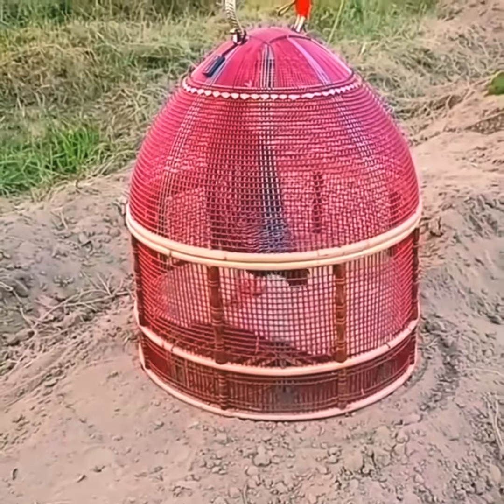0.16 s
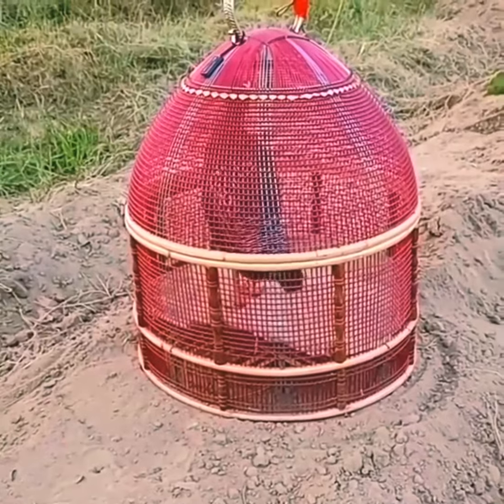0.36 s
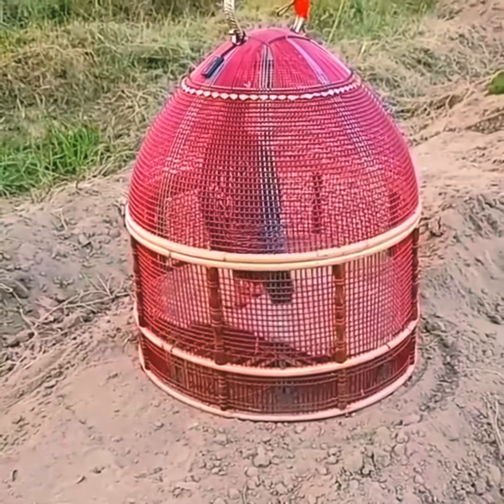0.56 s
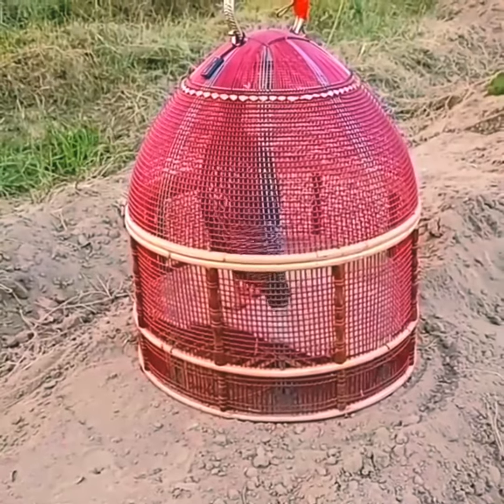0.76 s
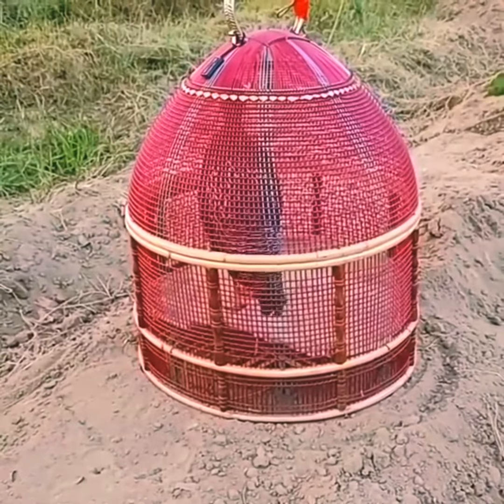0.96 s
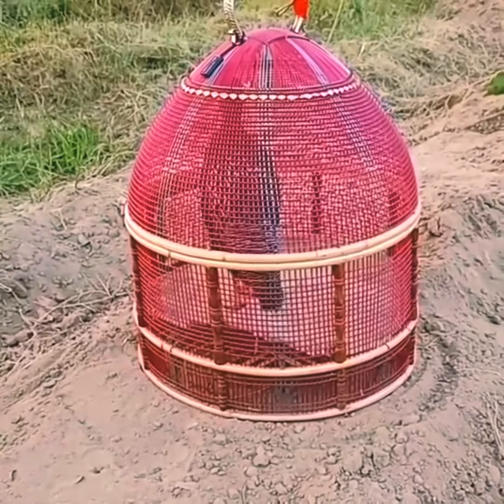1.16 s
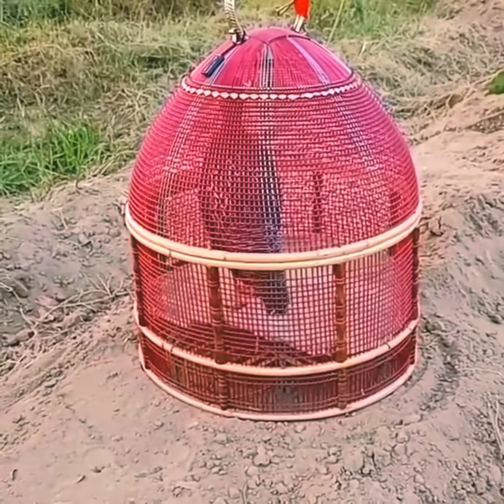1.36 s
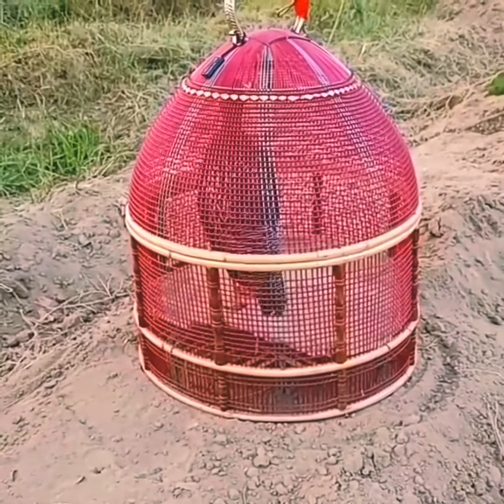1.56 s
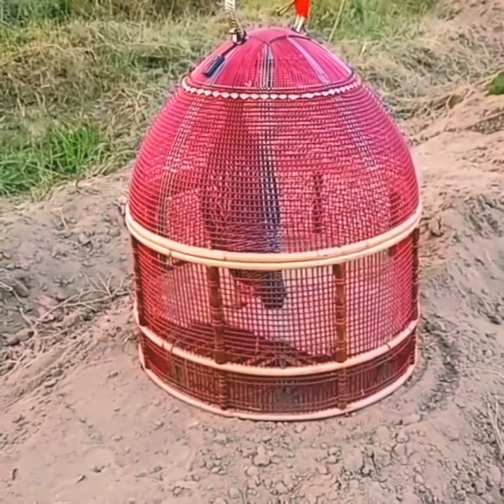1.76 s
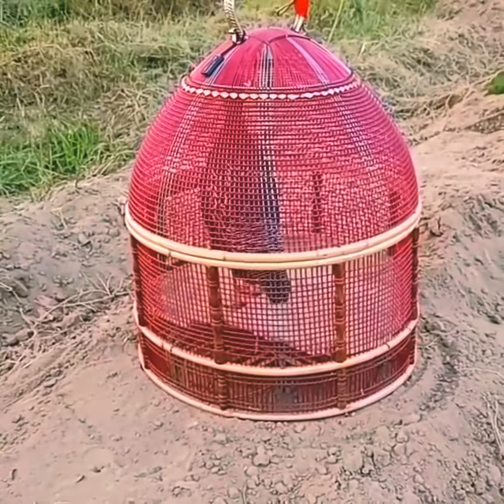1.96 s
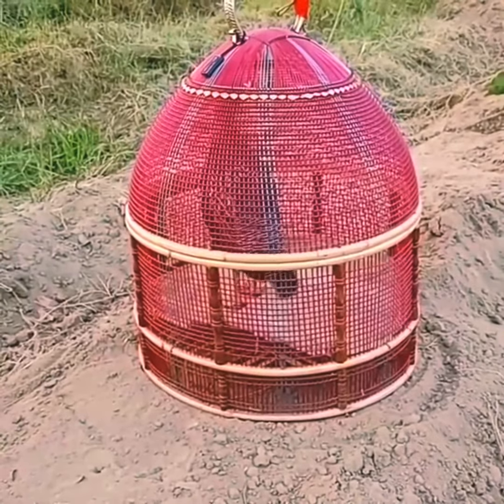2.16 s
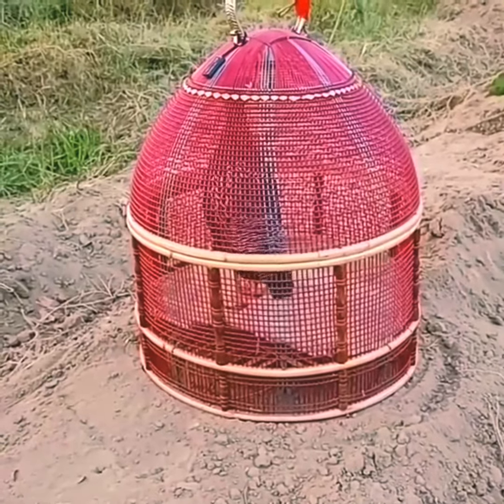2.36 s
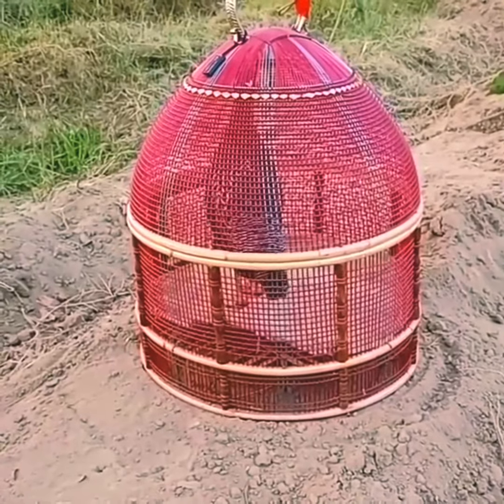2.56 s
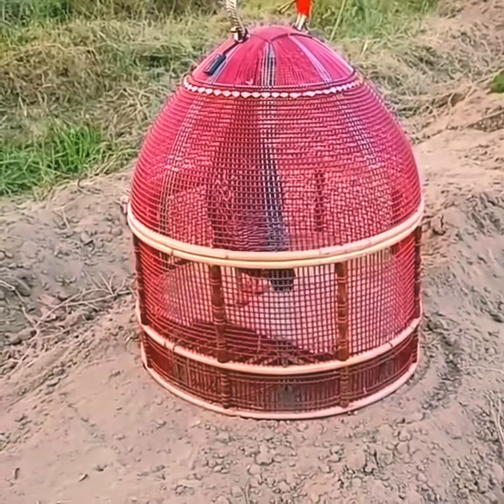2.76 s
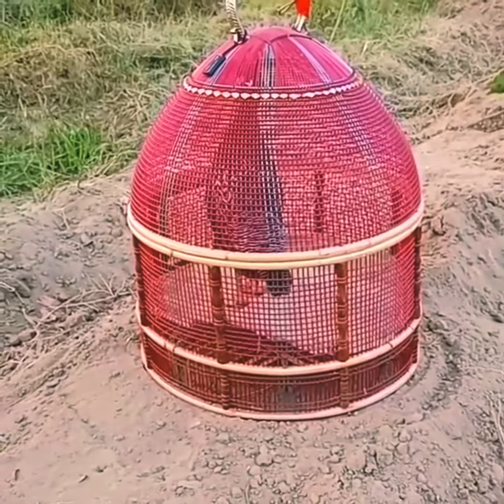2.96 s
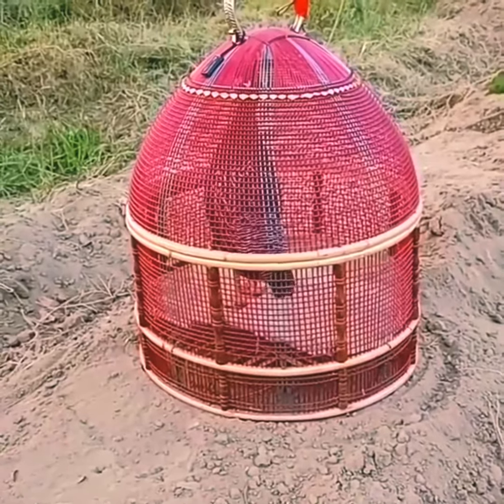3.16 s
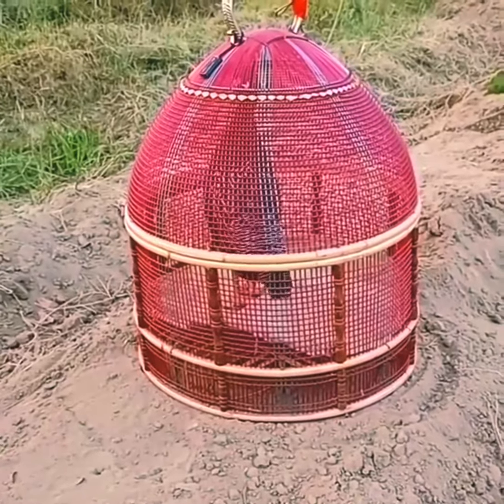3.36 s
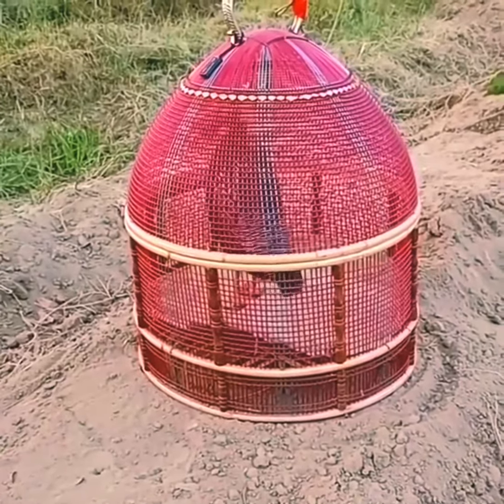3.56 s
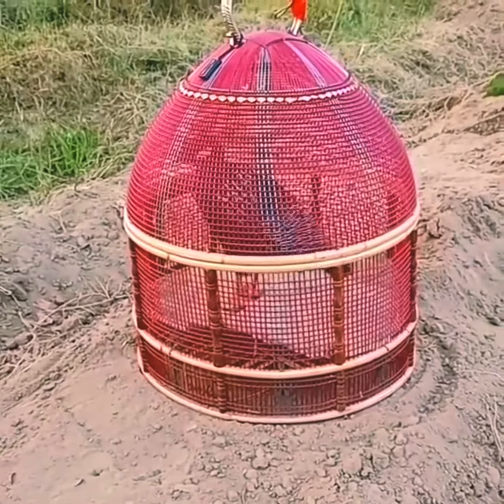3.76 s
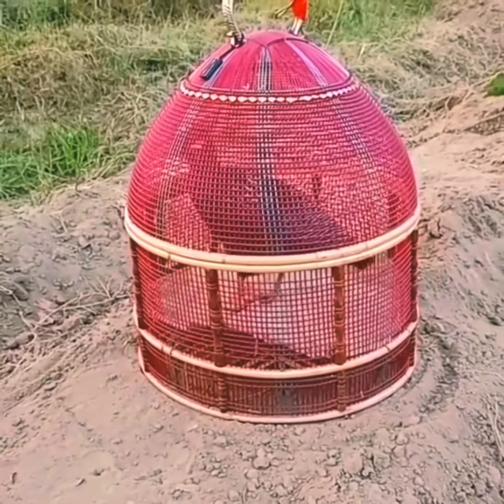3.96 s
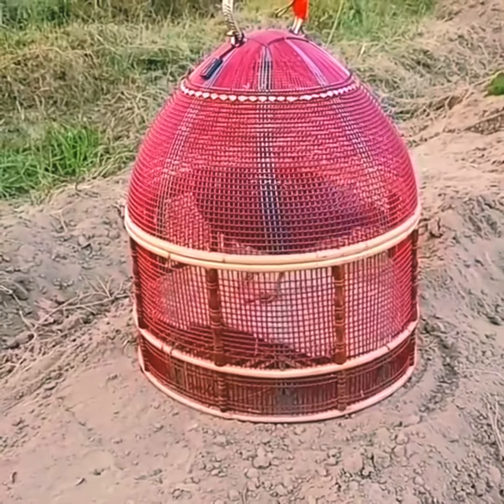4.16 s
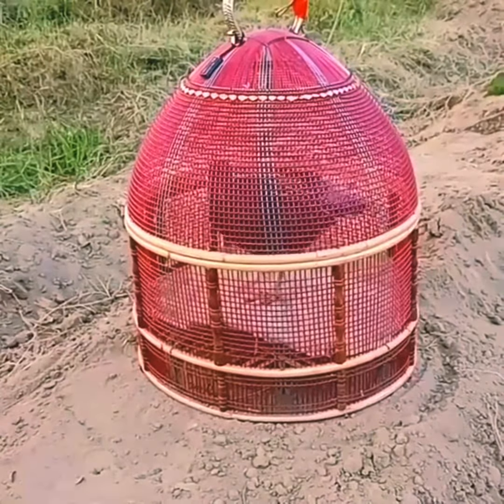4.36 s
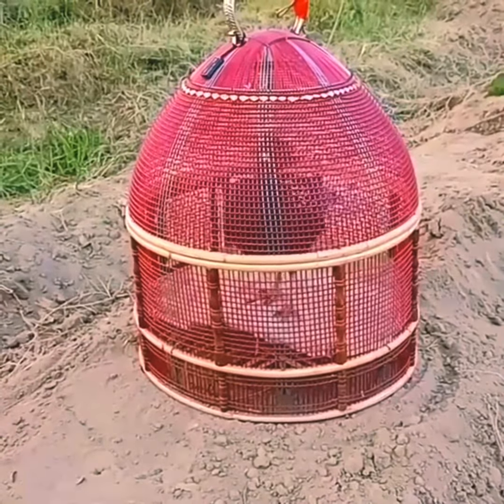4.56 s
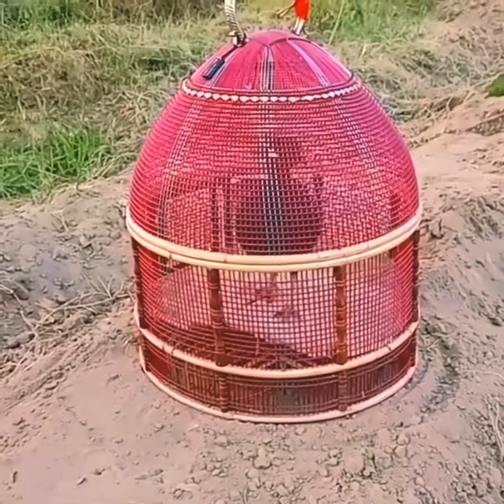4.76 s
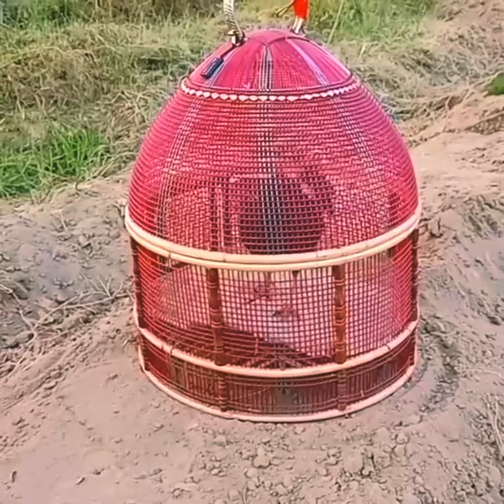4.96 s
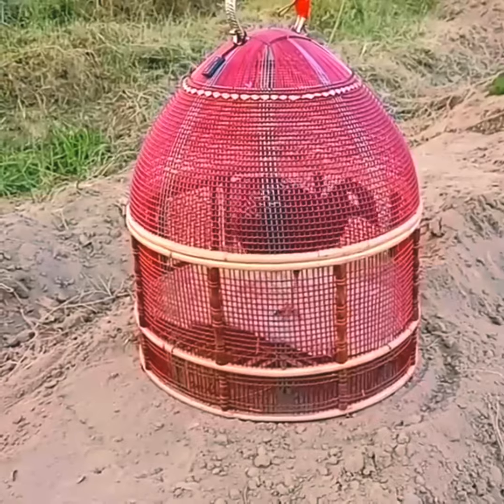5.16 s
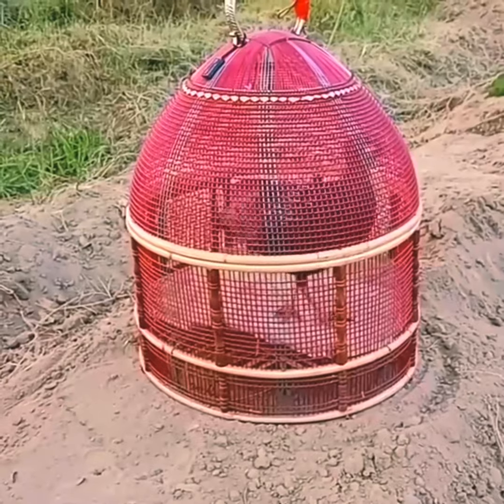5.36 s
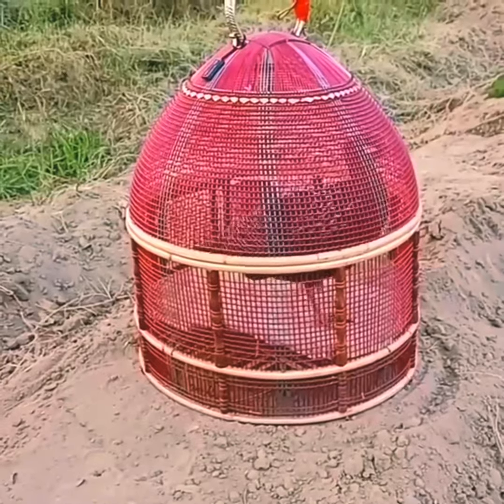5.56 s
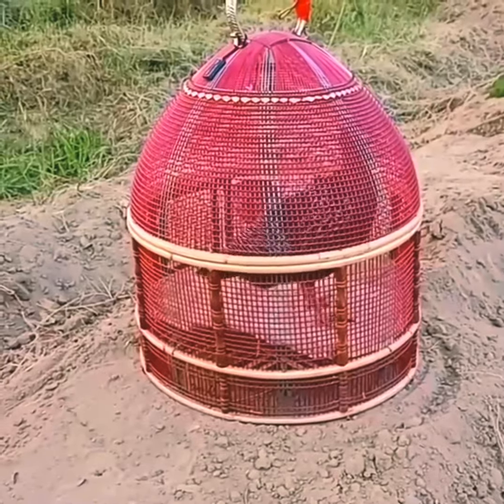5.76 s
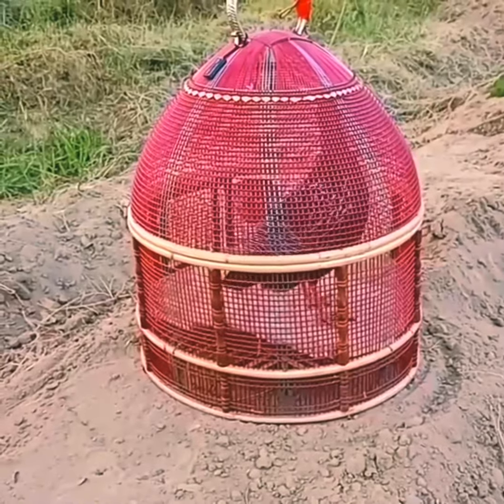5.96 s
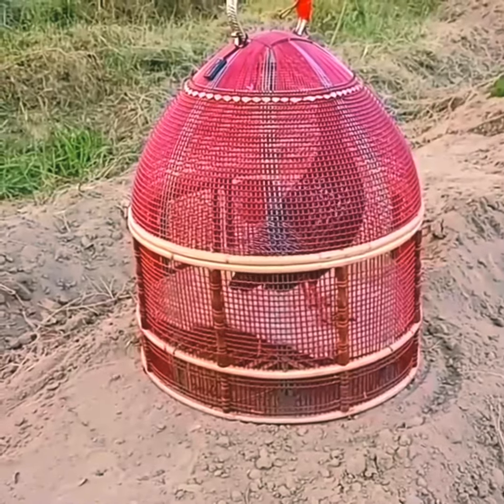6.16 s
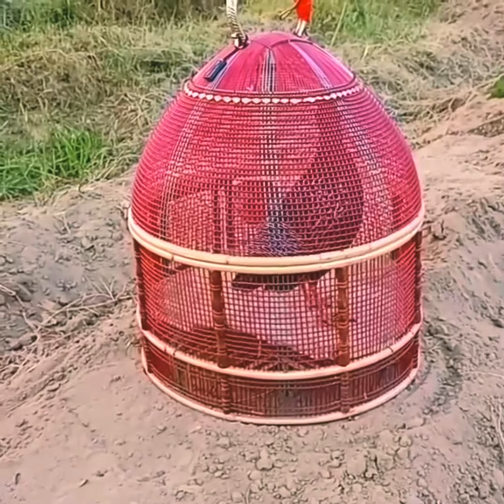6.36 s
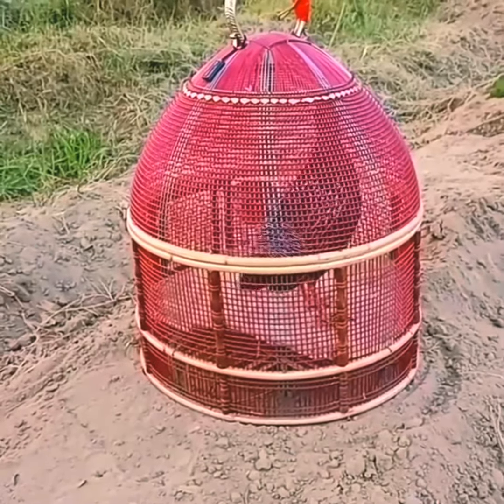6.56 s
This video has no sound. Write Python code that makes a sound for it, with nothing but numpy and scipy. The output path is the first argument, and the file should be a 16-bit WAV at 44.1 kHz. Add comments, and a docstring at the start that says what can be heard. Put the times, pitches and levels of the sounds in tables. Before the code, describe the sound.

Four loud, rasping partridge calls follow a sharp squeak, leaving soft whistles, a distant dove and a brief scratch on wicker.

```python
"""Caged partridge on farmland

A partridge in a wicker cage gives a few clucks, a squeak and four loud, harsh notes. Each harsh note is
a whistle swept over an octave some 250 times a second, now and then catching on its top pitch.
Soft whistles and chirps, a far dove, insects and a low rumble lie around it; later the bird steps about."""
import sys
import numpy as np
from scipy import signal
from scipy.fft import rfft, irfft, next_fast_len
from scipy.io import wavfile
from scipy.ndimage import uniform_filter1d, minimum_filter1d

SR = 44100
rng = np.random.default_rng(int(sys.argv[2]) if len(sys.argv) > 2 else 0)


def transcribe(u):
    """Save the signal u as a 16-bit wav file named by the first command-line argument.

    u: samples, shape (n,) or (channels, n), limited to [-1, 1]; the rate is SR.
    q: integer samples, one column per channel.
    """
    v = np.clip(np.atleast_2d(u).T, -1, 1)
    q = np.round(v * 32767).astype(np.int16)
    wavfile.write(sys.argv[1], SR, q)


N = 291060
T = np.arange(N) / SR

# squeak and harsh notes: start_s, end_s, level_db, attack_s, sweep_hz, low_turn_hz, low_dwell (1 = even)
HARSH_NOTES = [(0.3098, 0.337, -5, .004, 235, 2850, 1.6), (.686, .821, -7.5, .0016, 288, 3011, 2.2),
               (.988, 1.169, -9, 0.0059, 256, 2904, 1.49), (1.381, 1.468, -6.5, 0.011, 250, 2930, 1.25),
               (1.527, 1.703, -9, 0.0071, 250, 2893, 1.22)]
# throat and beak response: freq_hz, gain_db
THROAT_RESPONSE = [(600, -27), (1150, -26), (1450, -11), (1850, -7.5), (2300, -9), (2650, -6), (3100, 4.5),
                   (3700, -3), (4350, 2), (5150, -4), (5800, 2.5), (6900, 2), (8200, -9.5), (10000, -14),
                   (13600, -28), (15100, -4), (16000, -16)]


def from_db(db):
    """Decibels to gain."""
    return 10 ** (np.asarray(db) / 20)


def unit_rms(x):
    """Scale to unit power."""
    return x / np.sqrt(np.mean(x ** 2) + 1e-20)


def colour(x, points):
    """Filter by a curve of (freq_hz, gain_db) points."""
    hz, db = np.transpose(points)
    size = next_fast_len(len(x) + SR // 10)
    bins_hz = np.maximum(np.arange(size // 2 + 1) * SR / size, 1)
    gain = from_db(np.interp(np.log(bins_hz), np.log(hz), db))
    return irfft(rfft(x, size) * gain, size)[:len(x)]


def wander(rate_hz):
    """Smooth random drift, unit RMS."""
    lowpass = signal.butter(2, rate_hz, fs=SR, output="sos")
    return unit_rms(signal.sosfilt(lowpass, rng.standard_normal(N)))


def phase_of(hz):
    """Running oscillator phase in radians."""
    return 2 * np.pi * np.cumsum(hz) / SR


def note(start_s, length_s):
    """Sample indices, progress u (0-1) and half-sine swell of a note."""
    at = np.flatnonzero((T >= start_s) & (T < start_s + length_s))
    u = (T[at] - start_s) / length_s
    return at, u, np.sqrt(2) * np.sin(np.pi * u)


def field(rumble_swell_db=4.0, hiss_swell_db=1.46, lull_at_s=3.68, lull_length_s=.062):
    """Rumble and faint hiss of open land swell together; the rumble dips once, briefly."""
    # freq_hz, density_db
    spectrum = [(25, -21.5), (45, -9), (78, -0.5), (125, -9), (200, -17), (350, -25), (700, -29),
                (1500, -33), (3000, -32.5), (6000, -35), (8000, -36.5), (9000, -47.5), (13000, -46.5),
                (15500, -42.5)]
    air = from_db(-68) * unit_rms(colour(rng.standard_normal(N), spectrum))
    rumble = signal.sosfiltfilt(signal.butter(2, 250, fs=SR, output="sos"), air)
    hiss = air - rumble
    swell = wander(6)
    lull_db = -9 * np.exp(-(2 * (T - lull_at_s) / lull_length_s) ** 2)
    return rumble * from_db(rumble_swell_db * swell + lull_db - 3) + hiss * from_db(hiss_swell_db * swell)


def insects(fade_s=.12):
    """A thin, high band of noise, sung in bouts."""
    # start_s, end_s, level_db
    bouts = [(-.1, 0.403, -81), (1.75, 2.602, -78), (2.739, 3.521, -78), (3.718, 4.38, -82),
             (4.401, 5.17, -78.5), (5.48, 6.08, -76), (6.25, 6.8, -82)]
    # freq_hz, density_db
    band = [(5500, -39), (7000, -14.5), (7600, 0.5), (7950, -2), (8300, -32), (9000, -62)]
    level = sum(from_db(db) * np.clip(np.minimum(T - start_s, end_s - T) / fade_s, 0, 1)
                for start_s, end_s, db in bouts)
    return level * unit_rms(colour(rng.standard_normal(N), band))


def chatter(count=1100, length_s=.025, low_hz=2900, high_hz=5400, spread_db=6.5):
    """Far small birds: tiny, scratchy glides at random times, in two registers."""
    # time_s, level_db
    loudness = [(0, -86), (2.2, -72), (3.0, -84), (4.9, -96), (5.2, -69.5), (5.9, -77.5), (6.6, -79.5)]
    out, shake = np.zeros(N), 1 + .03 * wander(600)
    for k, start_s in enumerate(rng.uniform(0, N / SR, count)):
        pitch, slope, size = rng.standard_normal(3)
        at, u, swell = note(start_s, length_s)
        hz = (low_hz if k % 2 else high_hz) * 2 ** (.2 * pitch + .1 * slope * (u - .5))
        out[at] += from_db(spread_db * size) * swell * np.sin(phase_of(hz * shake[at]))
    return from_db(np.interp(T, *np.transpose(loudness))) * unit_rms(out)


def dove(pitch_hz=547.3, sag=.072):
    """Pure coos that sag in pitch at the end."""
    # start_s, length_s, level_db
    coos = [(1.25, .15, -72.5), (1.731, 0.1, -69.5), (2.168, .15, -70.5), (2.847, .13, -67),
            (3.23, 0.37, -75.5), (3.878, 0.083, -70), (4.431, 0.18, -67.5), (4.821, 0.25, -78),
            (5.46, .13, -71), (6.32, 0.12, -71)]
    out, shake = np.zeros(N), 1 + .025 * wander(39.65)
    for start_s, length_s, db in coos:
        at, u, swell = note(start_s, length_s)
        out[at] += from_db(db) * swell * np.sin(phase_of(pitch_hz * (1 - sag * u ** 3) * shake[at]))
    return out


def whistles(warble_hz=255, rise_oct=.34, fall_oct_per_s=12.5, chip_hz=2900, chip_every_s=.143):
    """Small birds, near sines: bent rises, steady falls, twitters and a run of buzzy falling chips."""
    # start_s, length_s, mid_pitch_hz, level_db, bend_oct (negative levels off), warble_oct
    rises = [(0.076, 0.1, 4886, -50.5, -0.79, 0.014), (0.178, 0.042, 6930, -61, -0.82, 0.012),
             (0.516, 0.095, 4770, -53.5, -0.5, 0), (0.537, 0.081, 4160, -58, -1, .02),
             (2.613, 0.093, 5010, -70.5, -.6, .03), (2.835, 0.078, 4700, -69.5, -.5, .05),
             (3.478, 0.049, 4700, -76, 0, .03), (3.69, .058, 4544, -79, -.2, .03),
             (6.03, .065, 6300, -76, -.4, .11), (6.091, .12, 5650, -69, -.2, .02),
             (6.216, 0.051, 6200, -74, 0.0051, .05), (6.291, .08, 5520, -69.5, .4, 0.044),
             (6.414, 0.052, 5680, -58, -0.017, .09), (6.453, 0.046, 5400, -69, 0.42, 0.013),
             (6.544, 0.094, 5740, -54, .2, .04)]
    # start_s, length_s, mid_pitch_hz, level_db
    falls = [(0.597, 0.082, 3100, -48), (1.886, 0.1, 3200, -64.5), (2.321, 0.085, 3634, -60),
             (3.345, .05, 4710, -74.5), (3.545, 0.034, 4950, -81), (4.448, 0.068, 2954, -77),
             (5.07, 0.025, 3386, -66), (5.3, 0.032, 3460, -66)]
    # start_s, length_s, pitch_hz, level_db, syllables_per_s, syllable_drop_oct
    twitters = [(0.045, .13, 2515, -61.5, 23, -0.21), (.163, .055, 2250, -61.5, 36, 0.14),
                (0.401, .11, 2235, -61.5, 9, .08), (1.854, 0.085, 2548, -58.5, 13, 0.24),
                (2.038, 0.097, 2220, -56, 12, 0.38), (2.124, 0.084, 2153, -67, 14, 0.23),
                (2.2, 0.074, 2377, -60.5, 40, 0.11), (2.405, 0.065, 2360, -64, 62, .28),
                (2.73, 0.27, 2550, -75, 4, .12), (3.079, .1, 2300, -77.5, 10, 0.26),
                (3.501, 0.065, 2910, -77.5, 16, 0), (4.757, 0.2, 2680, -72.5, 110, 0.012),
                (5.34, 0.21, 2520, -79, 5, .45)]
    out, shake = np.zeros(N), 1 + .008 * wander(360)
    warble = np.sin(phase_of(warble_hz * (1 + wander(45) / 4)))
    flutter = from_db(3 * wander(75.9))

    def sing(at, swell, hz, db, overtone_db=-40):
        """Add one note along a pitch path."""
        phase = phase_of(hz * shake[at])
        tone = np.sqrt(2) * (np.sin(phase) + from_db(overtone_db) * np.sin(2 * phase))
        out[at] += from_db(db) * swell ** 1.379 * flutter[at] * tone

    for start_s, length_s, hz, db, bend_oct, warble_oct in rises:
        at, u, swell = note(start_s, length_s)
        octaves = rise_oct * (u - .5) + bend_oct * (u - .5) ** 2 + warble_oct * warble[at]
        sing(at, swell, hz * 2 ** octaves, db)
    for start_s, length_s, hz, db in falls:
        at, u, swell = note(start_s, length_s)
        sing(at, swell, hz * 2 ** (-fall_oct_per_s * length_s * (u - .5)), db)
    for start_s, length_s, hz, db, syllables_per_s, drop_oct in twitters:
        at, u, _ = note(start_s, length_s)
        syllable, part = np.divmod(u * max(round(length_s * syllables_per_s), 1), 1)
        step_oct = .0914 * rng.standard_normal(N // 100)[syllable.astype(int)]
        octaves = step_oct - step_oct.mean() - drop_oct * (part - .5)
        sing(at, np.sqrt(2) * np.sin(np.pi * part), hz * 2 ** octaves, db)
    for chip in range(6):
        at, u, swell = note(start_s=5.54 + chip * chip_every_s, length_s=.055)
        octaves = .11 * warble[at] - .25 * (u - .5)
        sing(at, swell, chip_hz * 2 ** octaves, db=-74, overtone_db=-18)
    return out


def outdoors(x, cage_db, ground_db, ground_t60_s, trees_db, cage_t60_s=.035, trees_delay_s=.24):
    """Add quick scatter off the wicker, a tail off rough ground and a late, duller blur from trees."""
    t = T[:SR // 2]
    envelopes = [(cage_db, from_db(-60 * t / cage_t60_s)),
                 (ground_db, from_db(-60 * t / ground_t60_s)),
                 (trees_db, np.exp(-((t - trees_delay_s) / .06) ** 2 / 2))]
    cage, ground, trees = [from_db(db) * shape / np.linalg.norm(shape) * rng.standard_normal(len(t))
                           for db, shape in envelopes]
    ground = colour(ground, [(1000, -10), (2800, -2), (5000, 1), (7200, 9.5), (10000, 14.5), (15000, 10)])
    trees = colour(trees, [(1000, -9), (2800, -6.5), (5000, -1.5), (7200, .5), (8500, -9.5),
                           (15000, -21.5)])
    return x + signal.fftconvolve(x, cage + ground + trees)[:N]


def thumps():
    """Soft bumps of low noise under the bird's hardest pushes."""
    # start_s, length_s, centre_hz, level_db
    bumps = [(0.295, 0.043, 157, -57.5), (1.09, 0.042, 165, -62), (1.562, 0.045, 130, -60.5)]
    out = np.zeros(N)
    for start_s, length_s, hz, db in bumps:
        at, _, swell = note(start_s, length_s)
        band = [(hz / 4, -12), (hz, 0), (hz * 2, -18), (hz * 10, -60)]
        out[at] += from_db(db) * swell * unit_rms(colour(rng.standard_normal(len(at)), band))
    return out


def steps(t60_s=.073):
    """Claws scratch the wicker in short bursts."""
    # start_s, relative_peak_db
    footfalls = [(4.043, -57), (5.429, -50), (5.452, -66), (5.516, -46), (5.530, -73)]
    # freq_hz, gain_db
    wicker = [(800, -15), (2200, 4.5), (4000, 0), (6000, 7.5), (8000, -4), (12000, -8), (15000, -28)]
    bursts = sum(from_db(db - 60 * np.abs(T - start_s) / t60_s) * (T >= start_s)
                 for start_s, db in footfalls)
    return from_db(-8) * colour(bursts * rng.standard_normal(N), wicker)


def clucks(slack_glide=-.08, slack_roughness=.07):
    """The slack voice: short, rough harmonic stacks, alone and at both ends of each harsh note."""
    # start_s, length_s, pitch_hz, level_db, tilt_db_per_oct, glide_share, roughness_share
    lead_ins = [(.2725, .011, 1937, -23, -2, -0.14, 0.01), (.2795, .006, 2864, -12, -12, -0.53, 0.08),
                (.283, .01, 2157, -18.5, -3.5, -0.19, 0), (.289, .009, 1517, -29.5, -9.5, -.12, 0.05),
                (.658, 0.0059, 1440, -32.5, -9, -.2, 0.13), (.966, 0.0075, 1090, -22.5, -4.5, .15, 0.02),
                (1.358, 0.033, 1527, -44, -2.5, 0, 0.17), (1.514, 0.0098, 1600, -41.5, -1.5, -.12, .05)]
    notes = list(lead_ins)
    for start_s, end_s, db, *_ in HARSH_NOTES:
        onset = (start_s, .007, 1600, db - 20.5, -4, slack_glide, slack_roughness)
        dying = (end_s - .007, .015, 1470, db - 28.5, -10, slack_glide, slack_roughness)
        notes += [onset, dying]
    out, drift, flutter = np.zeros(N), wander(750), from_db(2.5 * wander(500))
    for start_s, length_s, pitch_hz, db, tilt_db_per_oct, glide, roughness in notes:
        at, u, swell = note(start_s, length_s)
        hz = pitch_hz * (1 + glide * (u - .5)) * (1 + roughness * drift[at])
        stack = np.zeros(len(at))
        for k in range(1, 10):
            gain = from_db(tilt_db_per_oct * np.log2(k)) * (k * hz < SR / 2)
            stack += gain * np.sin(k * phase_of(hz) + rng.uniform(0, 2 * np.pi))
        out[at] += from_db(db) * swell * unit_rms(colour(stack * flutter[at], THROAT_RESPONSE))
    return out


def catches(switch_s=.00082, stall_s=.022, stall_depth=.3):
    """The voice catches on its top pitch (free = 0); the sweep stops there and slows around each onset."""
    # start_s, end_s, pitch_hz, level_change_db
    holds = [(0.3132, 0.3324, 7486, -4.5), (.689, 0.6904, 5990, 4), (1.1051, 1.111, 6840, 0.5),
             (1.1183, 1.135, 6923, 1.5), (1.5835, 1.597, 7104, 1)]
    free, catch_hz, catch_db = np.ones(N), np.zeros(N), np.zeros(N)
    for start_s, end_s, hz, db in holds:
        held = np.clip(np.minimum(T - start_s, end_s - T) / switch_s + .5, 0, 1)
        u = np.clip((T - start_s) / (end_s - start_s), 0, 1)
        catch_hz += held * hz * (1 - .14 * (u - .6) ** 2)
        catch_db += held * db
        free *= 1 - held
    stall = np.max([np.exp(-np.abs(T - start_s) / stall_s) for start_s, *_ in holds], axis=0)
    pace = free * (1 - stall_depth * stall)
    return free, pace, catch_hz, catch_db


def harsh_notes(top_turn_hz=6200, release_share=.17, sweep_sag=.17, flutter_db=3.0, rasp_db=-27):
    """A fast-swept whistle that climbs, grows louder and drops back; its period doubles near the low turn."""
    # pitch_multiple, level_db, fall_db_per_oct (of pitch above the low turn)
    partials = [(.5, -27, 8), (1.5, -6, 13), (2, -3, 5.5), (2.5, -10.5, 8.5), (3, -15.5, 6)]
    free, pace, catch_hz, catch_db = catches()
    pace *= 1 + .018 * wander(100)
    level, sweep = np.zeros(N), np.zeros(N)
    low_hz, top_hz = np.full(N, top_turn_hz / 2), np.full(N, float(top_turn_hz))
    for start_s, end_s, db, attack_s, sweep_hz, low_turn_hz, low_dwell in HARSH_NOTES:
        at, u, _ = note(start_s, end_s - start_s)
        attack = np.clip((T[at] - start_s) / attack_s, 0, 1)
        release = np.clip((1 - u) / release_share, 0, 1)
        level[at] = from_db(db) * attack * release
        slack = (u - .6) ** 2   # both turning pitches arch with the push of the note
        low_hz[at] = low_turn_hz * (1 - .33 * slack)
        top_hz[at] = top_turn_hz * (1 - .091 * slack)
        cycle = phase_of(sweep_hz * pace[at] * (1 - sweep_sag * (2 * u - 1) ** 2))
        skewed = cycle - .2 * (1 - np.cos(cycle))
        sweep[at] = ((1 - np.cos(skewed)) / 2) ** low_dwell
    low_hz *= 1 + .015 * wander(60)
    top_hz *= 1 + .02 * wander(200)
    swept_hz = (low_hz + (top_hz - low_hz) * sweep) * (1 + .01 * wander(1240))
    hz = catch_hz + free * swept_hz
    phase, octaves = phase_of(hz), np.log2(np.abs(hz / low_hz) + 1e-9)
    voice = np.sin(phase)
    for multiple, db, fall_db_per_oct in partials:
        richness = .19 + .6 * free if multiple % 1 == 0 else free   # a held pitch is nearly pure
        voice += richness * from_db(db - fall_db_per_oct * octaves) * np.sin(multiple * phase)
    voice *= from_db(free * (flutter_db * wander(700) + .5 * sweep - 1))
    voice += from_db(rasp_db) * rng.standard_normal(N)
    voice /= np.std(voice[level > 0])
    return colour(level * from_db(catch_db) * voice, THROAT_RESPONSE)


def scene():
    """Near partridge, far birds and the field, alike in both channels."""
    partridge = harsh_notes() + clucks() + steps()
    near = outdoors(partridge, cage_db=-14, ground_db=-22, ground_t60_s=.24, trees_db=-42) + thumps()
    birds = whistles() + dove() + chatter()
    far = outdoors(birds, cage_db=-19, ground_db=-11.5, ground_t60_s=.5, trees_db=-19.5)
    return np.tile(near + far + field() + insects(), (2, 1))


def record(dry, ceiling=.81, hold_s=.0011, asymmetry=.004, cutoff_hz=15900):
    """Fast peak limiter, a slightly lopsided response that thumps under loud notes, steep low-pass."""
    window = int(hold_s * SR)
    gain = ceiling / np.maximum(np.abs(dry), ceiling)
    limited = dry * uniform_filter1d(minimum_filter1d(gain, window), window)
    highpass = signal.butter(2, 70, "high", fs=SR, output="sos")
    lopsided = limited + asymmetry * signal.sosfilt(highpass, limited ** 2)
    return signal.sosfilt(signal.ellip(10, .1, 70, cutoff_hz, fs=SR, output="sos"), lopsided)


dry = scene()
out = record(dry)
transcribe(out)
```